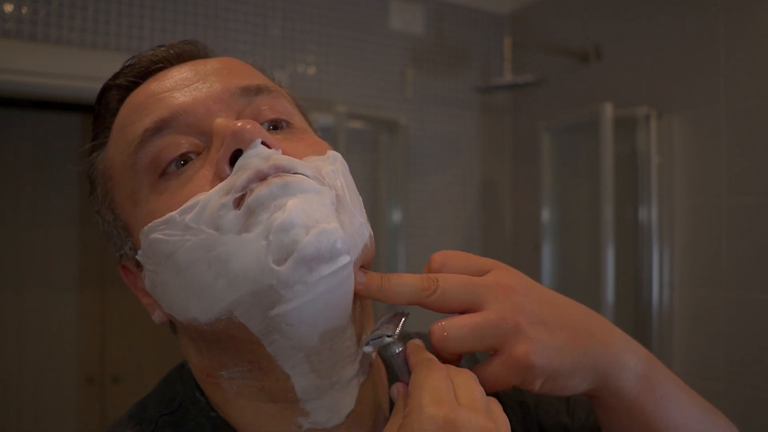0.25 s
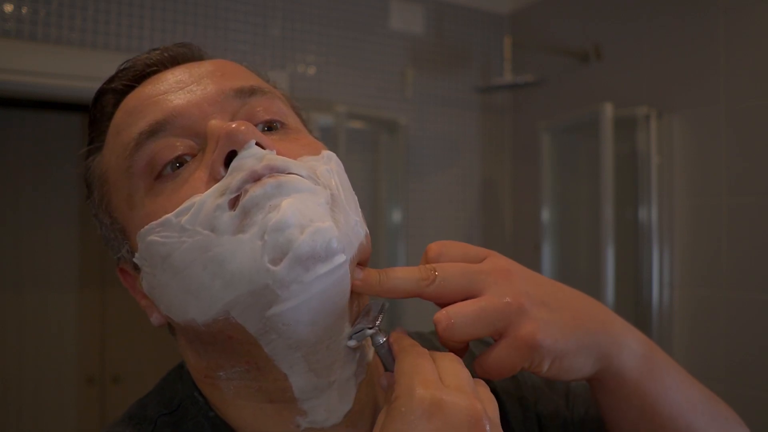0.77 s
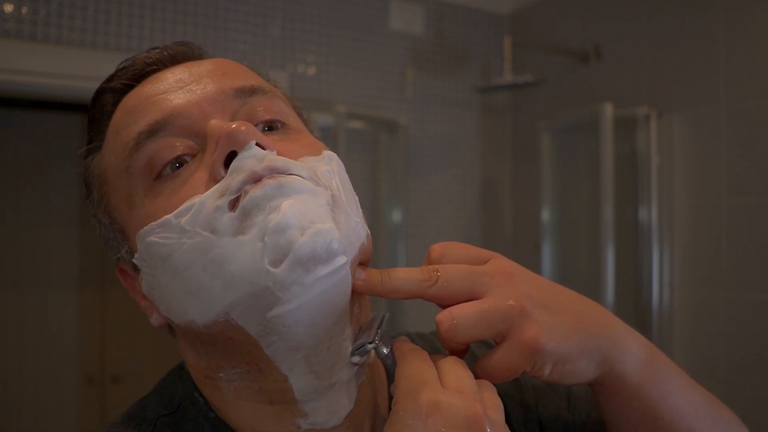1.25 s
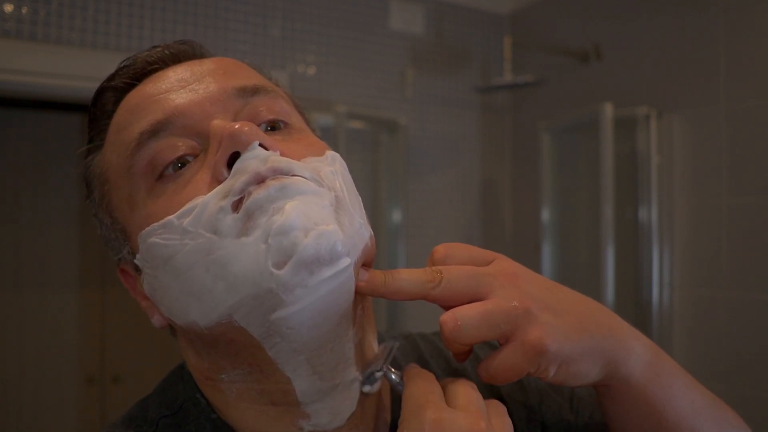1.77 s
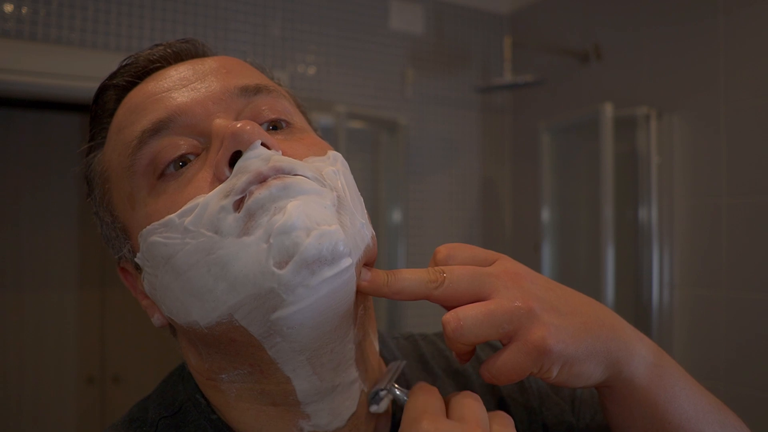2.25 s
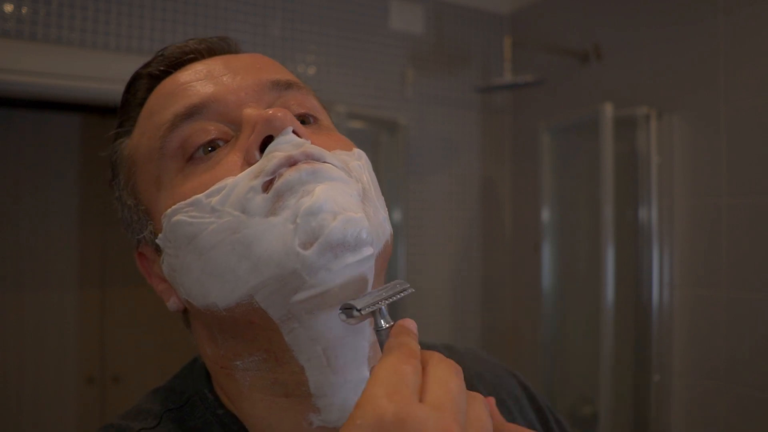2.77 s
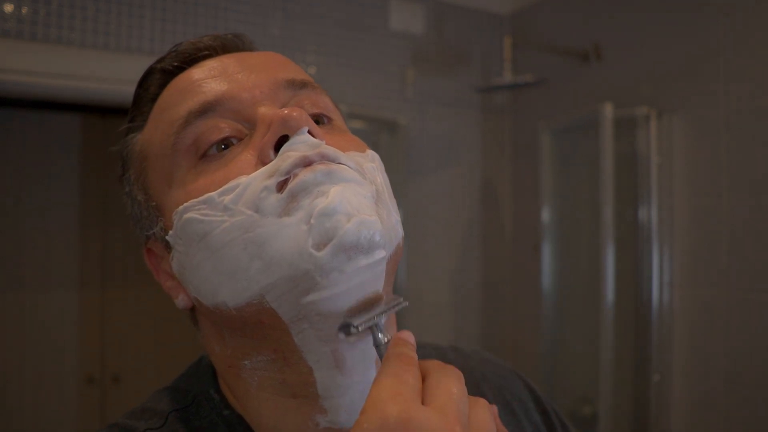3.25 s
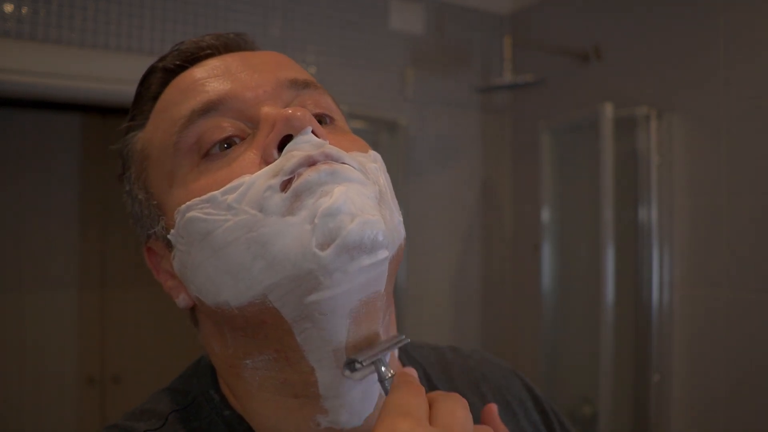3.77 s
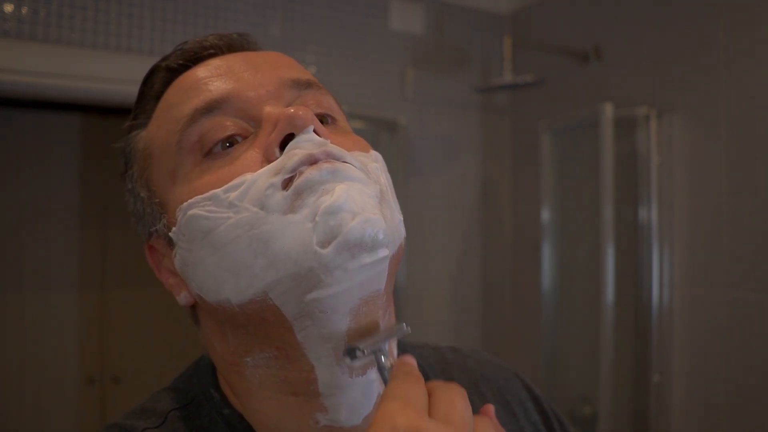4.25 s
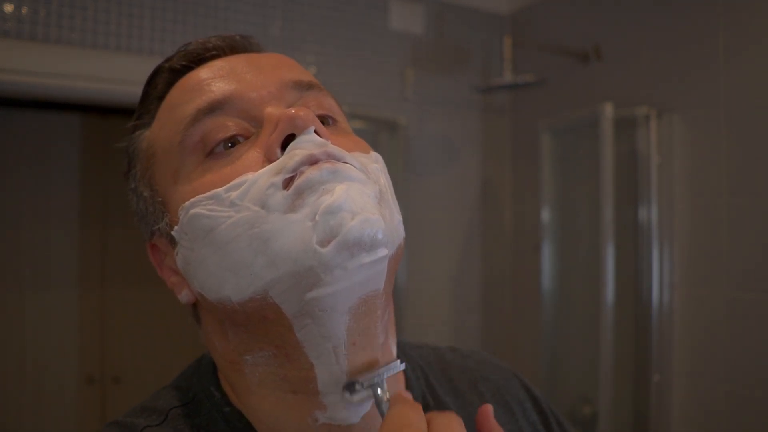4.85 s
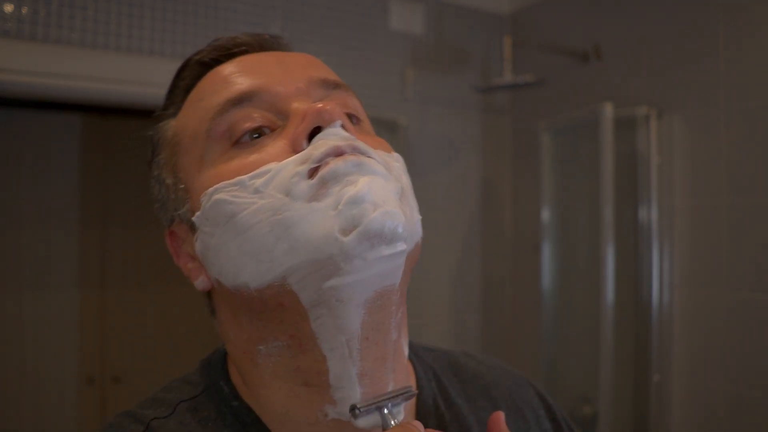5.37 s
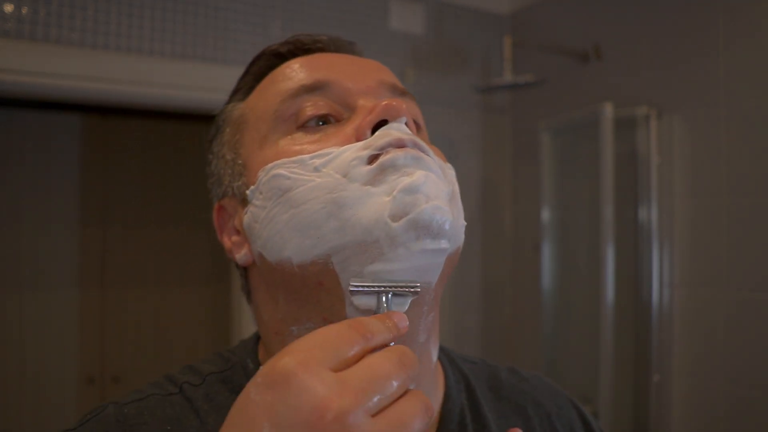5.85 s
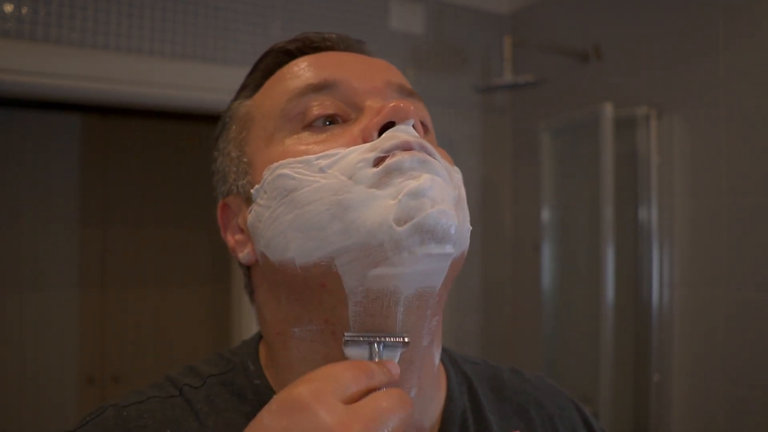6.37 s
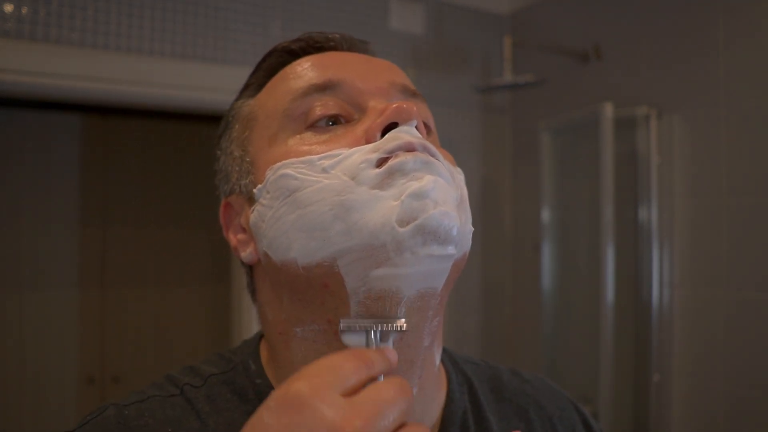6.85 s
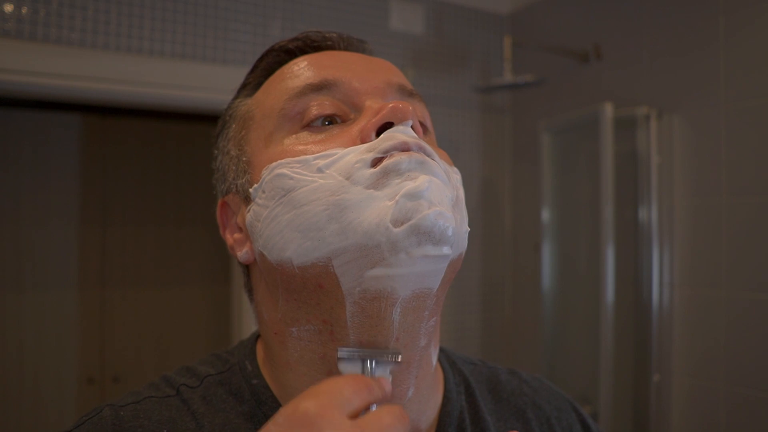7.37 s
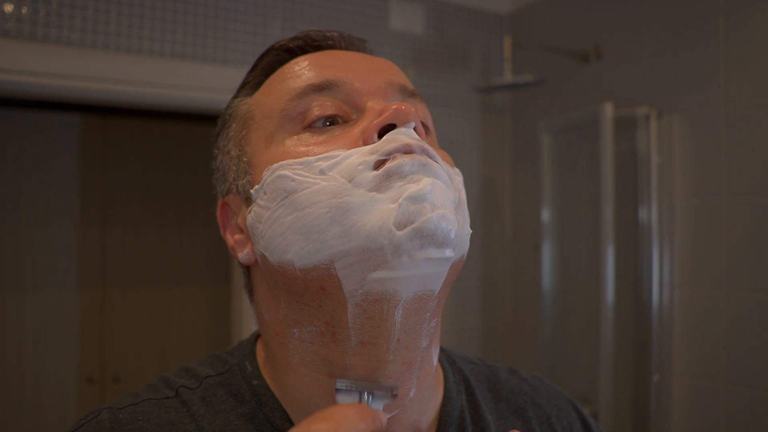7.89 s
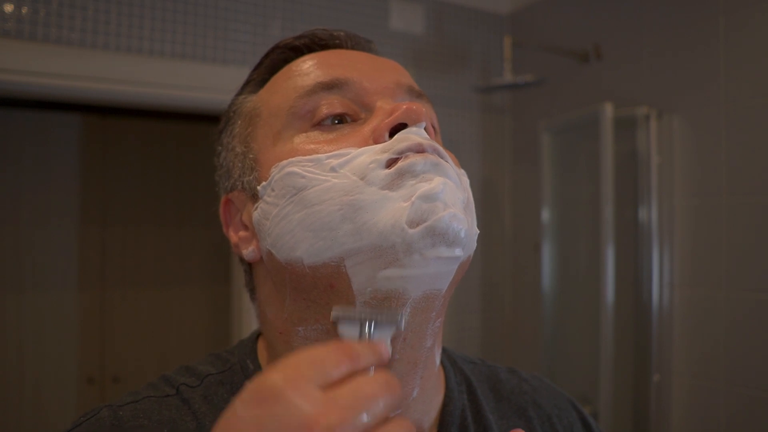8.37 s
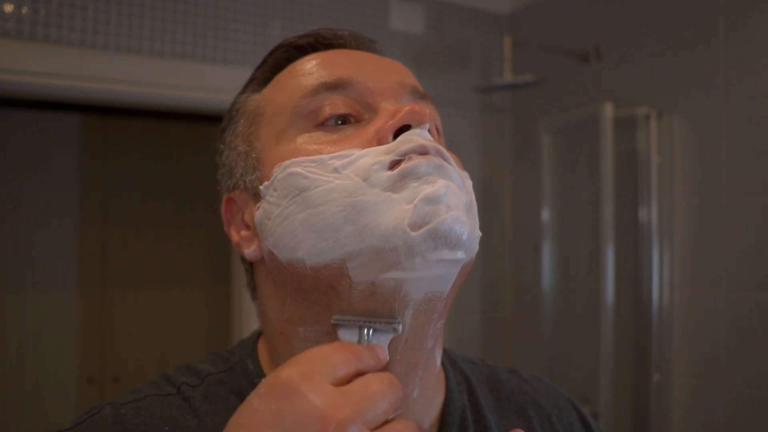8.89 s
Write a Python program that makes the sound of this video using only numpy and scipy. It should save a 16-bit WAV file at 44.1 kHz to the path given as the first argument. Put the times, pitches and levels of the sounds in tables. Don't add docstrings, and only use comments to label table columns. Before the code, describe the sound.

A safety razor scrapes through lathered stubble in short crisp strokes with small pauses, over a steady low beating fan hum in a tiled bathroom.

```python
import sys
import numpy as np
from scipy import signal
from scipy.fft import rfft, irfft
from scipy.io import wavfile
from scipy.ndimage import uniform_filter1d

SR = 44100
rng = np.random.default_rng(int(sys.argv[2]) if len(sys.argv) > 2 else 0)


def transcribe(signal):
    frames = np.atleast_2d(signal).T
    limited = np.clip(frames, -1, 1)
    pcm = np.round(limited * 32767).astype(np.int16)
    wavfile.write(sys.argv[1], SR, pcm)


def magnitude_from_level(level_db):
    exponent = np.asarray(level_db, float) / 20
    return 10 ** exponent


N = 402191

# (touch [s], speeding up [s], full speed [s], scrape level [dB], hairs cut [1/s])
STROKES = [(0.954, 0.063, 0.051, -53, 1660), (1.334, 0.038, 0.053, -54, 3150),
           (1.642, 0.12, 0.044, -52, 4900), (2.05, 0.036, .14, -56.5, 3700), (3.255, .11, 0.03, -55, 1900),
           (3.607, .12, 0.049, -51, 2400), (3.982, .13, 0.044, -49.5, 2200),
           (4.39, 0.087, 0.084, -50.5, 2350), (4.79, 0.089, 0.052, -53, 3000),
           (5.135, 0.074, 0.091, -55, 3600), (6.225, 0.11, 0.047, -50.5, 2160),
           (6.639, 0.073, 0.036, -48.5, 2600), (6.98, 0.1, 0.061, -50, 2800),
           (7.365, 0.064, 0.068, -53, 2100), (7.71, 0.047, 0.14, -57.5, 2400),
           (8.055, 0.025, 0.12, -63, 2000), (8.749, 0.077, 0.11, -56.5, 800), (8.89, 0.13, .14, -52, 880)]
# (lowest skin ring [Hz], its level [dB], skin share [dB])
PLACES = [(2580, 2.5, -1.5), (2510, 4, 2), (2540, 1.5, 1.5), (2530, 4.5, 2.5), (2520, 2, -4),
          (2530, 4.5, -2.5), (2530, 0.5, -4), (2460, -1, -4), (2460, -2.5, -6), (2397, -3, -4.5),
          (2300, 1, -8.5), (2250, 0, -9), (2330, -2, -11), (2350, -5, -12.5), (2340, -3, -10.5),
          (2385, 3, -10), (2330, -1, -13), (2330, -3, -17.5)]
# (low blade ring [dB], edge ring [dB], bright share [dB], top air [dB])
ANGLES = [(-4.5, -2, 1.5, 1.5), (-8, -1, 0.5, 1), (-2.5, -0.5, 0, 0.5), (-2, -1, 0, 0), (-4.5, 1, -4, -1.5),
          (-3.5, -1.5, -1.5, -2), (-7.5, -1, -1, -1.5), (-5.5, -2.5, 1, -1), (-5.5, -4, 0, -.5),
          (-1.5, 0.5, -0.5, -1), (-1, 2.5, -0.5, -1.5), (-2, 2, 1.5, -0.5), (-2, 0, 1.5, 2.5),
          (-2.5, 1.5, 1.5, .5), (-6.5, -2.5, 3.5, .5), (-6, -4, 3.5, -0.5), (1.5, 2, -4.5, -2),
          (0.5, 3, -4, -1.5)]
LEAD_S = 0.035


def evened(x):
    return x / np.sqrt(np.mean(x ** 2) + 1e-20)


def smooth_noise(size, *shape):
    return evened(uniform_filter1d(rng.standard_normal((*shape, N)), size))


def read(points, hz):
    f, value = np.transpose(points)
    return np.interp(np.log(hz + 1), np.log(f + 1), value)


def air():
    # (frequency [Hz], level [dB per Hz])
    breath = [(12, -75), (20, -22), (43, -24.5), (72, -11.5), (110, -9), (138, -7), (172, -15), (410, -17),
              (574, -29.5), (1910, -31.5), (2460, -34), (3250, -33.5), (3530, -36), (6720, -39.5),
              (16000, -47.5)]
    # (frequency [Hz], width [Hz], level [dB])
    duct = [(69.6, 4.4, -70), (160, 5.2, -65), (217.6, 11.7, -64.5), (245.6, 6.9, -67.5), (311, 21, -73),
            (410.3, 4, -76), (875, 290, -74.5), (3208, 64, -85), (6640, 330, -84)]
    # (frequency [Hz], left-right likeness [-1 to 1])
    likeness = [(60, 1.0), (130, 1.0), (290, 0.93), (640, 0.73), (1410, 0.59), (3100, 0.49), (6820, 0.17),
                (15000, -0.17)]
    frames, hz = N // 2048 + 5, np.fft.rfftfreq(8192, 1 / SR)
    a, b, c, d, patches = rng.standard_normal((frames, len(hz), 5)).T
    patches = evened(uniform_filter1d(uniform_filter1d(patches, 60, 0), 3, 1))

    power = magnitude_from_level(read(breath, hz)) ** 2
    power *= magnitude_from_level(-57) ** 2 / power.sum()
    for f, width_hz, db in duct:
        shape = 1 / (1 + (2 * (hz - f) / width_hz) ** 2) ** 2
        power += magnitude_from_level(db) ** 2 * shape / shape.sum()

    same = np.clip(read(likeness, hz), -1, 1)[:, None]
    left = a + 1j * b
    right = same * left + np.sqrt(1 - same ** 2) * (c + 1j * d)
    z = np.array([left, right]) * np.sqrt(power)[:, None] * magnitude_from_level(0.58 * patches)
    noise = signal.istft(z, nperseg=8192, noverlap=6144)[1][:, :N]
    return np.sqrt(power.sum()) * evened(noise)


def tone(hz, db, waver_db):
    waver = evened(uniform_filter1d(smooth_noise(2500), 2500))
    phase = 2 * np.pi * (hz * np.arange(1, N + 1) / SR + rng.random())
    return np.sqrt(2) * magnitude_from_level(db + waver_db * waver) * np.sin(phase)


def hum():
    # (time [s], level [dB])
    whine_swell = [(0, -90), (1, -83), (1.5, -80), (3.2, -87), (5.5, -82), (6, -79), (9.12, -79)]
    # (frequency [Hz], level [dB])
    bearing_lines = [(300, -75), (408.5, -74.5), (3150, -100), (3250, -78), (3350, -88.5), (6500, -89.5)]
    whine_db = np.interp(np.arange(N) / SR, *np.transpose(whine_swell))
    whine = tone(1898, whine_db, waver_db=3.0)
    bearing = sum(tone(hz, db, waver_db=2.1) for hz, db in bearing_lines)
    mains = tone(99.915, -52, waver_db=1.3)
    fan = tone(120.85, -52.5, waver_db=1.33)
    return mains * magnitude_from_level([[0.1], [-0.1]]) + fan * magnitude_from_level([[-0.1], [0.1]]) + whine + bearing


def scatter(ms, count, spike):
    h = rng.standard_normal((count, 400)) * magnitude_from_level(-60 * np.arange(400) / SR / (ms / 1000))
    for _ in range(2):
        z = rfft(h)
        h = irfft(z / np.sqrt(uniform_filter1d(abs(z) ** 2, size=7)))
    h = h * (np.arange(400) < 300)
    h = h / np.linalg.norm(h, axis=1, keepdims=True)
    h[:, 0] += spike
    return h / np.linalg.norm(h, axis=1, keepdims=True)


def room(x):
    # (frequency [Hz], time to fall 60 dB [s])
    tiles = [(1500, 0.36), (3000, 0.19), (6000, 0.22), (10000, 0.2), (16000, 0.15)]
    out, turn = np.zeros((2, N)), np.arange(N) / SR * 7
    for k in range(3):
        taps = np.zeros((2, SR // 2))
        at = np.arange(200, SR // 2 - 20, 20)
        at = at + rng.integers(0, 20, (2, len(at)))
        np.put_along_axis(taps, at, rng.choice([-1., 1.], at.shape), 1)

        hz, t, z = signal.stft(taps, SR, nperseg=256)
        z[1] = np.where(hz[:, None] < 4000, 0.64 * z[0] + 0.32 * z[1], z[1])
        fall_db = -60 * t / read(tiles, hz)[:, None]
        stall_db = -13.5 + fall_db / 6.6
        tail = signal.istft(z * (magnitude_from_level(fall_db) + magnitude_from_level(stall_db)), SR, nperseg=256)[1]
        tail = tail / np.linalg.norm(tail[0])

        fed = x * np.sqrt(2 / 3) * np.cos(np.pi * (turn + k / 3))
        out += signal.fftconvolve(fed[None], tail, axes=1)[:, :N]
    return out


def drop():
    # (time [s], peak level [dB], room level [dB])
    smack = [(5.5924, -28.5, -7)]
    # (frequency [Hz], level [dB per Hz])
    splash_colour = [(530, -31), (900, -23), (1230, -12), (1750, -1.5), (2070, -0.5), (4980, 4.5),
                     (16000, -4.5)]
    s, peak_db, room_db = smack[0]
    hit, spike = np.zeros((2, N)), np.zeros(N)
    for late_s, db in [(0.0007, 6.5), (0.002, -16), (0.0047, -19)]:
        a = round((s + late_s) * SR)
        hit[:, a:a + 400] += magnitude_from_level(peak_db + db + 2.5) * scatter(9.2, count=2, spike=0.5)
    spike[round(s * SR)] = magnitude_from_level(peak_db + room_db + 19.5)

    colour_db = np.maximum(read(splash_colour, abs(np.fft.fftfreq(1024, 1 / SR))), -60)
    log_gain = np.log(magnitude_from_level(colour_db))
    colour = np.fft.ifft(np.exp(np.conj(signal.hilbert(log_gain)))).real[:512]
    colour = colour[None] / np.linalg.norm(colour)
    return signal.oaconvolve(hit + room(spike), colour, axes=1)[:, :N]


def stroke(rise_s, full_s, top_db, skin_db, bright_db):
    # (skin, blade, bright [dB])
    sag_db = [1, 0.5, 0.5]
    lead_db = [-16, -7, -9]
    touch_db = [-15, -15.5, -16.5]
    lift_db_per_s = [-180, -220, -240]
    t = np.arange(-LEAD_S, rise_s + full_s + 0.25, 1 / SR)
    lead = (t < 0) * (1 - t / LEAD_S)
    early = np.clip(1 - t / rise_s, 0, 1) ** 1.37
    sag = np.clip((t - rise_s) / full_s, 0, 1)
    late = np.maximum(t - rise_s - full_s, 0)
    shape_db = np.c_[lead_db] * lead + np.c_[touch_db] * early
    shape_db = shape_db + np.c_[sag_db] * sag + np.c_[lift_db_per_s] * late
    speed = 1 - (1 - 0.25) * early
    return speed, top_db + np.c_[[skin_db, 0, bright_db]] + shape_db


def cut_hairs():
    clumps = smooth_noise(260)
    hair_db = 2.5 * np.minimum(rng.exponential(1, N), 4) + 0.8 * clumps
    size = magnitude_from_level(hair_db) * rng.choice([-1., 1.], (3, N))
    wander = magnitude_from_level(1.58 * smooth_noise(round(0.03 * SR), 3))
    chance, uneven = rng.random(N), smooth_noise(300)
    stiff_size = magnitude_from_level(11 + 3.5 * rng.standard_normal((2, N)))[[0, 0, 1]]

    clicks, stiff = np.zeros((3, N)), np.zeros((3, N))
    for (s, rise_s, full_s, top_db, per_s), place, angle in zip(STROKES, PLACES, ANGLES):
        a = round((s - LEAD_S) * SR)
        speed, level_db = stroke(rise_s, full_s, top_db, place[2], angle[2])
        speed, level = speed[:N - a], magnitude_from_level(level_db[:, :N - a])
        on = slice(a, a + level.shape[1])
        hairs_per_s = per_s * speed

        cuts = size[:, on] * (chance[on] < hairs_per_s / SR) / np.sqrt(speed)
        clicks[:, on] += evened(cuts) * level * wander[:, on] * magnitude_from_level(-2.5)

        slips_per_s = np.minimum(9e4 / hairs_per_s, 105) * np.exp(0.5 * uneven[on])
        slips = np.diff(np.floor(np.cumsum(slips_per_s / SR)), prepend=0)
        slow_db = 6 * np.log2(np.clip(2000 / hairs_per_s, 1, 3))
        stiff[:, on] += stiff_size[:, on] * slips * level * magnitude_from_level(slow_db)
    return clicks, stiff


def snap_hairs(stiff):
    # (time [s], peak level [dB], skin ring above it [dB], bright snap above it [dB])
    snaps = [(0.9192, -38, -26, -10.5), (0.9773, -35, -8, -19), (1.0281, -27, -22, -18),
             (1.3443, -40, -5, -16), (1.421, -40, -9, -9), (1.6446, -42, -10, -14), (2.0562, -44, 2, -15),
             (3.401, -38, -15, -22), (3.7862, -25.5, -22, -19), (3.9843, -48, -15, -21),
             (4.12, -24, -26, -10), (4.4707, -29, -23, -11), (4.792, -40, -23, -16), (6.192, -49, -14, -14),
             (6.2572, -42, -24, -12), (6.3076, -30, -23, -11), (6.3657, -26.5, -23, -13),
             (6.645, -40, -25, -10), (6.7027, -33, -25, -15), (6.8553, -36, -22, -20),
             (7.0349, -40, -29, -12), (7.0613, -35.5, -23, -7), (7.3732, -39, -25, -9),
             (8.1105, -41, -18, -12), (8.699, -35, -23, -24), (8.754, -34.5, -22, -21),
             (8.7774, -38, -22, -16), (8.8538, -32, -25, -19), (8.979, -31, -27, -17),
             (9.0089, -40, -24, -17)]
    # (skin, blade, bright [dB])
    snap_share_db = [10, 0, 19]
    for s, peak_db, skin_db, bright_db in snaps:
        layer_db = peak_db + np.array([skin_db, 0, bright_db]) + snap_share_db
        stiff[:, round((s + 0.0007) * SR)] = magnitude_from_level(layer_db)


def pair(x, alike, left_db):
    alike, place = np.clip(alike, 0, 1), rng.integers(0, 6, N)
    echoes = np.zeros((2, N))
    for k in range(6):
        bursts = scatter(3.5, count=2, spike=0.25)
        echoes += signal.oaconvolve((x * (place == k))[None], bursts, axes=1)[:, :N]
    both = np.sqrt(alike) * x + np.sqrt(1 - alike) * echoes
    return both * magnitude_from_level([[left_db / 2], [-left_db / 2]])


def ring(modes, passes=1.365):
    hz = np.fft.rfftfreq(2048, 1 / SR)
    z = 0
    for k, (f, width_hz, db) in enumerate(modes):
        z = z + (-1) ** k * magnitude_from_level(db) / (1 + 2j * (hz - f) / width_hz) ** passes
    h = irfft(z)[:1024]
    return h / np.linalg.norm(h)


def ring_bodies(drive):
    # (frequency [Hz], width [Hz], level [dB])
    skin_rings = [(2910, 260, -2.5), (3357, 424, 1), (3916, 170, -6)]
    # (frequency [Hz], width [Hz], level [dB])
    blade_rings = [(5780, 320, -1), (6620, 900, -3.5), (7870, 450, -7.5)]
    # (frequency [Hz], width [Hz], level [dB])
    bright_rings = [(8600, 1620, -1), (10600, 1300, 2), (12500, 2900, -2), (15300, 3200, -5)]
    starts = [0] + [round((row[0] - 0.04) * SR) for row in STROKES[1:]] + [N]
    out = np.zeros((2, N + 1424))
    for a, b, place, angle in zip(starts, starts[1:], PLACES, ANGLES):
        low_hz, low_db, _ = place
        blade_db, edge_db, _, air_db = angle
        skin = [(low_hz, 300, low_db)] + skin_rings
        blade = [(4290, 660, blade_db), (5327, 450, edge_db)] + blade_rings
        bright = bright_rings[:2] + [(f, w, db + air_db) for f, w, db in bright_rings[2:]]
        for layer, modes in zip(drive, [skin, blade, bright]):
            rung = signal.oaconvolve(layer[:, a:b], ring(modes)[None], axes=1)
            out[:, a:a + rung.shape[1]] += rung
    return out[:, :N]


def razor():
    layer_likeness = [0.97, 0.92, 0.09]
    # (skin, blade, bright [dB])
    layer_left_db = [-1, 4, 2.5]
    clicks, stiff = cut_hairs()
    snap_hairs(stiff)
    drive = np.zeros((3, 2, N + 400))
    drive[:, :, :N] = [pair(*layer) for layer in zip(clicks, layer_likeness, layer_left_db)]

    bursts = scatter(15.0, count=160, spike=0.69).reshape(80, 2, 400) * magnitude_from_level([[0.8], [-0.8]])
    for at in np.flatnonzero(stiff[1]):
        drive[:, :, at:at + 400] += stiff[:, at, None, None] * bursts[at % len(bursts)]
    close = ring_bodies(drive)
    return close + magnitude_from_level(-3.0) * room(close.mean(0))


def scene():
    return air() + hum() + drop() + razor()


def roll_off(x):
    return signal.sosfilt(signal.butter(12, 16450, fs=SR, output="sos"), x)


def record(dry):
    edge = signal.firwin(2047, 15770, window=("kaiser", 9), fs=SR)
    mix = signal.oaconvolve(dry, edge[None], "same")
    return roll_off(mix)


dry = scene()
out = record(dry)
transcribe(out)
```